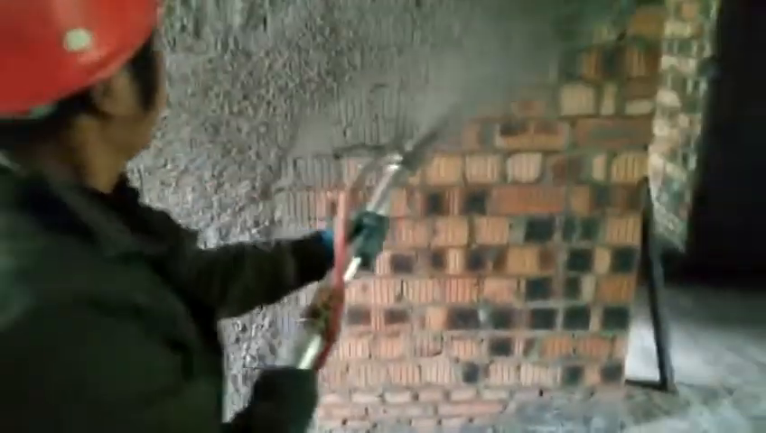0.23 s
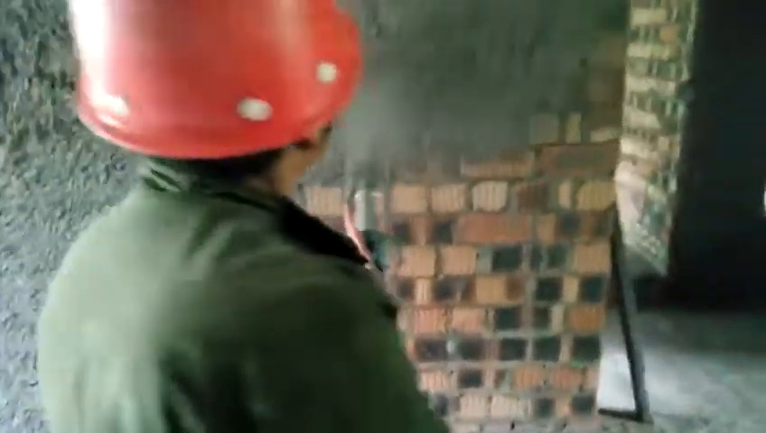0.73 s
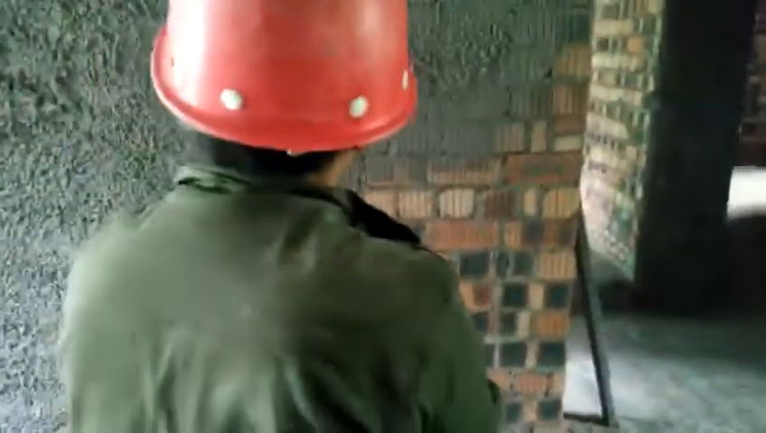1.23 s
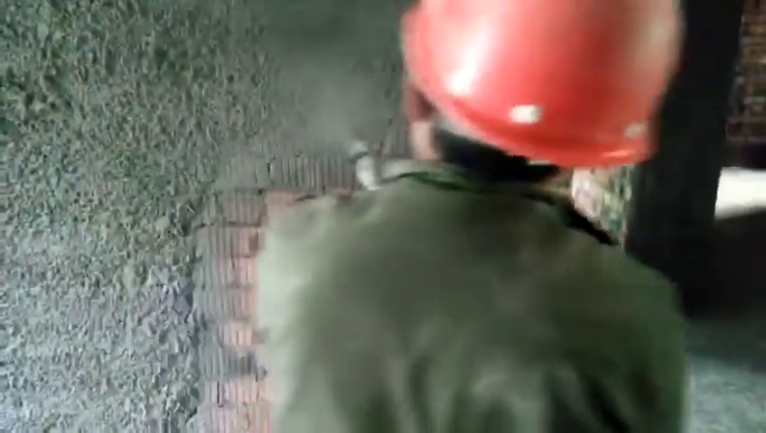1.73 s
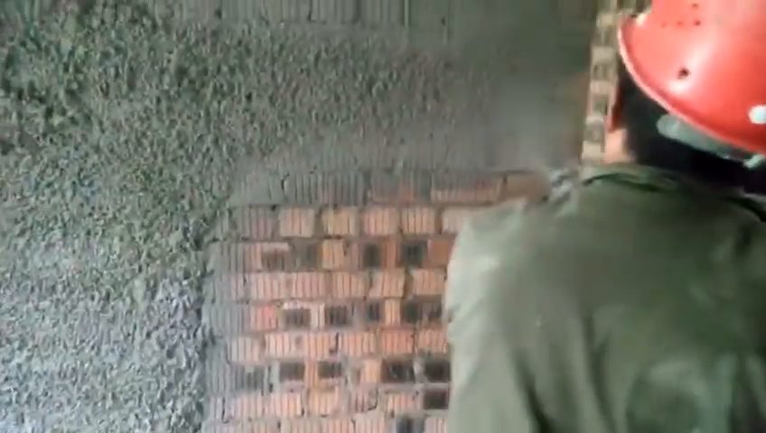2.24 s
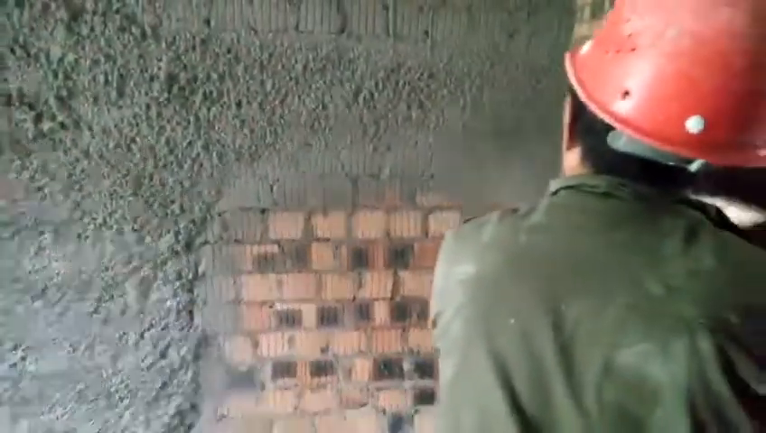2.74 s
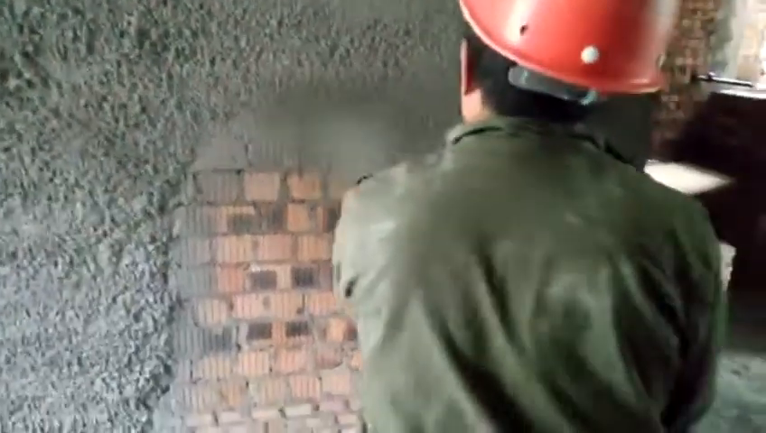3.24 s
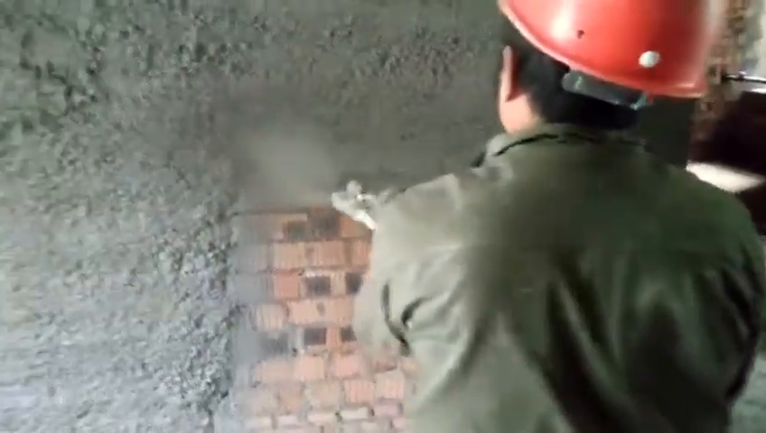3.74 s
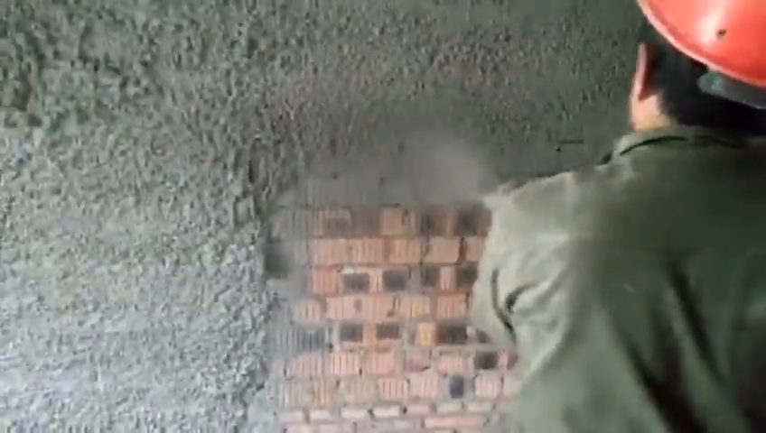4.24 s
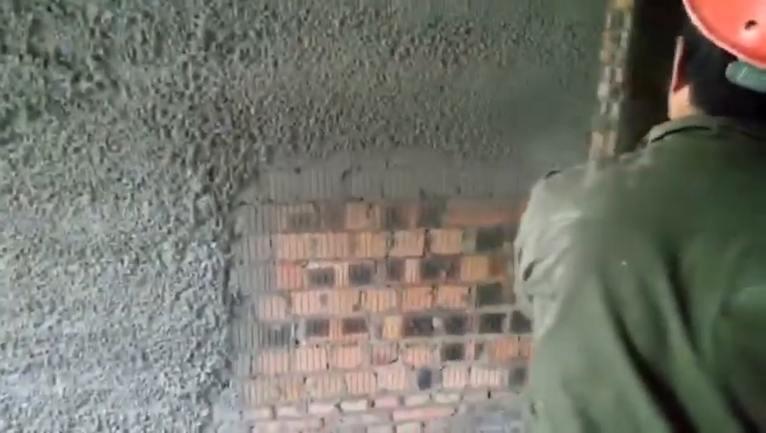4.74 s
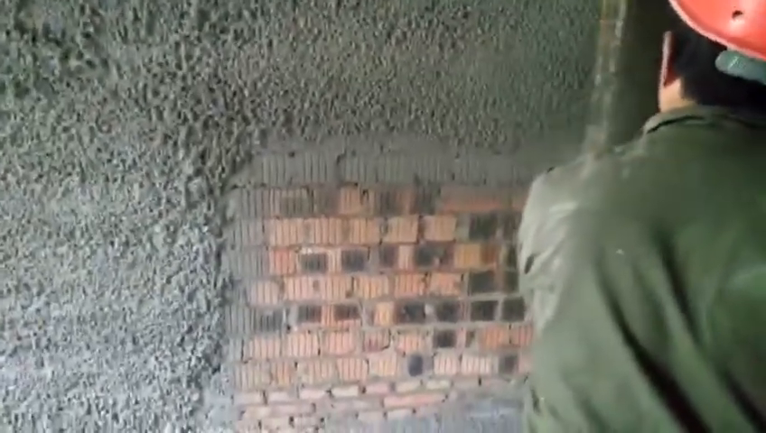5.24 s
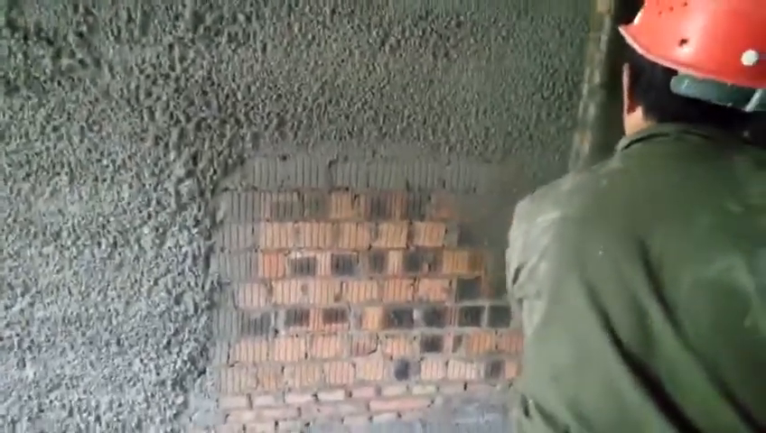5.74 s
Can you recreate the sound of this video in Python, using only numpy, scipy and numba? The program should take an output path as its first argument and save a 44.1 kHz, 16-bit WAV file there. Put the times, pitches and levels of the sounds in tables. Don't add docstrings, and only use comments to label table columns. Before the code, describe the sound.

A spray gun roars and hisses without pause as wet mortar hits brick, with faint hollow knocks in its pipe, in a bare echoing room.

```python
import sys
import numpy as np
from scipy import signal
from scipy.fft import rfft, irfft, next_fast_len
from scipy.io import wavfile
from scipy.ndimage import uniform_filter1d, map_coordinates
from numba import njit

SR = 44100
rng = np.random.default_rng(int(sys.argv[2]) if len(sys.argv) > 2 else 0)


def amplitude_ratio(level_db):
    exponent = np.asarray(level_db, float) / 20
    return 10 ** exponent


def inscribe(sig):
    pcm = np.round(np.clip(np.atleast_2d(sig).T, -1, 1) * 32767)
    wavfile.write(sys.argv[1], SR, pcm.astype(np.int16))


N = 264159

# [start_s, roar_level_db, mortar_load_db (over its mean),
# splatter_facing_db (toward the microphone)]
SPRAY_COURSE = [(0, -27.5, 0, -3), (.3, -28.5, -2.5, -1.5), (.65, -26, 0.5, -1), (.85, -28, -1.5, -0.5),
                (1.05, -29, -1.5, -2.5), (1.33, -28, -0.5, 1.5), (1.6, -27.5, 1, -2), (2.2, -28, -.5, 1),
                (2.6, -27.5, 3, 0), (2.88, -25.5, 3, 0.5), (3.2, -28.5, -1, 1.6), (3.9, -28, -1, -2.5),
                (4.4, -27.5, 0.5, -2.5), (4.65, -29, -1, 1.5), (5.05, -26.5, 2.5, 1.5),
                (5.38, -28, -0.4, 3), (5.75, -26.5, 3.5, -0.7), (5.99, -27, 3, 0.5)]


def jet():
    roar_db, load_db, facing_db = columns(SPRAY_COURSE)
    surge_db = roar_db + 27.5
    upper_db = -13 - (1 - 0.03) * surge_db
    grit_db = -17 - (1 - 0.091) * surge_db - load_db - clot_choke_db()
    splat_db = -9.5 - (1 - 0.13) * surge_db + facing_db
    spray = nozzle_roar() + amplitude_ratio(upper_db) * upper_jet()
    spray = spray + amplitude_ratio(grit_db) * grit_hiss() + amplitude_ratio(splat_db) * splatter()
    return amplitude_ratio(roar_db) * hold_roar(walls(spray, count=9))


# [pitch_hz, level_db (per Hz)]
ROAR_COLOUR = [(820, -36), (1400, -8.5), (1780, -3.5), (1930, -2.5), (2300, 1), (3000, -14.5),
               (3900, -32.5), (6600, -120)]


def nozzle_roar():
    return turbulence(ROAR_COLOUR, patchy_db=0.62, patch_rate=4.01, flicker_db=0.0, flicker_rate=12, count=6)


# [pitch_hz, level_db (per Hz)]
UPPER_COLOUR = [(1760, -25), (3000, -4), (4320, -9.5), (4810, -12), (6260, -5), (7100, -10), (9230, -74.5),
                (15600, -120)]


def upper_jet():
    return turbulence(UPPER_COLOUR, patchy_db=1.08, patch_rate=8.2, flicker_db=0.6, flicker_rate=16, count=8)


# [pitch_hz, level_db (per Hz)]
GRIT_COLOUR = [(4200, -22.5), (7100, -5), (7500, -3.5), (9500, 0.5), (11000, -2.5), (11800, -8),
               (12300, -12), (12800, -17), (13400, -17.5), (14000, -13.8), (14300, -15.5)]


def grit_hiss():
    colour = GRIT_COLOUR
    return turbulence(colour, patchy_db=0.95, patch_rate=10, flicker_db=0.7, flicker_rate=14, count=7)


# [centre_s, depth_db, length_s]
CLOTS_IN_NOZZLE = [
    (0.657, 4, .1),
    (1.15, 2.5, 0.073),
    (1.345, 5, 0.068),
    (1.522, 1.5, .08),
    (1.803, -1.5, .08),
    (2.87, 4, 0.081),
    (4.065, 4.5, 0.091),
    (5.2, 3, .08),
    (5.727, 1.5, .12),
]


def clot_choke_db():
    now = np.arange(N) / SR
    return sum(depth * np.exp(-(2 * (now - s) / length) ** 2) for s, depth, length in CLOTS_IN_NOZZLE)


# [pitch_hz, level_db (per Hz)]
SPLAT_COLOUR = [(700, -48), (880, -23), (960, -11.5), (1080, 1.5), (1400, -1), (1820, -32), (3080, -120)]


def splatter():
    return turbulence(SPLAT_COLOUR, patchy_db=0.86, patch_rate=5, flicker_db=1.0, flicker_rate=22, count=4)


def hold_roar(spray):
    power = uniform_filter1d(uniform_filter1d(spray ** 2, SR // 16), SR // 16)
    hiss = signal.sosfiltfilt(signal.butter(2, 3000, "high", fs=SR, output="sos"), spray)
    steady = 0.34
    held_roar = (spray - hiss) * power.mean() ** (steady - 0.31) / power ** steady
    return held_roar + hiss / power.mean() ** 0.23


def walls(x, count):
    out, now = x.copy(), np.arange(N)
    lags_s, signs = rng.uniform(.003, .035, count), rng.choice([-1, 1], count)
    for lag_s, sign in zip(lags_s, signs):
        swing_s = .00022 * walk(4.5) + .00025 * walk(.9)
        echo = map_coordinates(x, [now - SR * (lag_s + swing_s)], order=3, mode="wrap")
        out += sign * amplitude_ratio(-5.5) * np.exp(-lag_s / .03) * echo
    return out * np.std(x) / np.std(out)


# [pitch_hz, width_hz, level_db]
LOW_PAIR = [(363.8, 40, -4.5), (403, 64, 0)]
# [centre_s, level_db, length_s]
LOW_SLUGS = [(0.125, -50.5, 0.091), (0.544, -51.5, 0.38), (0.99, -50, 0.71), (1.426, -48, 0.25),
             (1.794, -42.5, 0.21), (2.124, -43.5, 0.53), (2.61, -40.5, 0.29), (3.07, -47, 0.27),
             (3.332, -44, 0.28), (3.83, -50, 0.11), (4.31, -51.5, 0.21), (4.68, -46, 0.16),
             (5.402, -55, 0.26), (5.916, -53.5, 0.13)]
# [centre_s, level_db, length_s, pitch_hz]
MIDDLE_SLUGS = [(.15, -39, 0.44, 602), (.52, -42.5, 0.26, 600), (.85, -54, 0.14, 625),
                (1.22, -45.5, 0.39, 585), (1.65, -43.5, .25, 567), (1.98, -39, 0.29, 579),
                (2.3, -45.5, 0.28, 598), (2.78, -44.5, 0.1, 627), (3.17, -39.5, 0.44, 614),
                (3.45, -46, 0.13, 620), (3.75, -42, 0.51, 606), (4.219, -36.5, 0.2, 586),
                (4.9, -39.5, 0.26, 626), (5.12, -41, 0.24, 645), (5.329, -41, 0.15, 621),
                (5.75, -46.5, 0.43, 603)]
# [centre_s, level_db, length_s]
HIGH_SLUGS = [(.02, -64.5, 0.055), (.65, -60, 0.21), (1.15, -51.5, 0.27), (1.5, -40.5, 0.19),
              (1.73, -41.5, 0.36), (2.35, -48, 0.34), (2.58, -43.5, 0.26), (2.999, -47.5, 0.35),
              (3.24, -51, 0.14), (3.6, -50.5, .1), (4.2, -51, 0.65), (4.7, -47.5, 0.27), (5.5, -57.5, 0.99)]
BETWEEN_SLUGS = (-55, -47.5, -66.5)
# [start_s, peak_db, pitch_hz]
LUMPS = [(0.041, -39.5, 641), (0.139, -30, 626), (0.185, -33, 646), (0.335, -33.5, 580),
         (0.388, -35.5, 579), (0.414, -34.5, 565), (0.491, -29, 600), (0.57, -27, 583), (0.6, -34.5, 590),
         (0.707, -39, 540), (0.827, -35, 650), (0.899, -38, 390), (1.145, -33, 525), (1.187, -32.5, 573),
         (1.27, -35, 575), (1.477, -29, 828), (1.579, -36, 584), (1.662, -34.5, 579), (1.716, -32, 543),
         (1.968, -28.5, 406), (2, -29, 543), (2.033, -31, 536), (2.127, -37, 415), (2.183, -31, 530),
         (2.254, -33, 468), (2.357, -33, 654), (2.438, -33.5, 409), (2.515, -31, 635), (2.631, -32.5, 400),
         (2.757, -33.5, 636), (2.79, -36, 575), (2.892, -33, 567), (2.932, -36.5, 651), (3.119, -30, 430),
         (3.178, -30.5, 597), (3.21, -32, 540), (3.297, -30, 412), (3.349, -34, 393), (3.585, -34.5, 555),
         (3.706, -32, 598), (3.886, -30.5, 522), (4.08, -38, 584), (4.147, -33, 570), (4.178, -33.5, 587),
         (4.426, -38, 664), (4.647, -30, 420), (4.688, -32, 417), (4.786, -30, 632), (4.86, -33, 712),
         (4.9, -35, 658), (4.986, -34, 535), (5.126, -31.5, 670), (5.192, -32.5, 705), (5.287, -31, 663),
         (5.346, -30, 576), (5.606, -40.5, 641), (5.65, -31, 579), (5.796, -33, 620), (5.853, -41, 610),
         (5.892, -38, 633)]


def lance():
    all_slugs = (LOW_SLUGS, MIDDLE_SLUGS, HIGH_SLUGS)
    low_db, middle_db, high_db = [swells(*np.transpose(slugs)[:3], rest_db)
                                  for slugs, rest_db in zip(all_slugs, BETWEEN_SLUGS)]
    middle_hz = columns(MIDDLE_SLUGS)[-1]
    low_flow, middle_flow, high_flow = [rng.standard_normal(N) * amplitude_ratio(2.6 * walk(30)) for _ in range(3)]
    low = sum(amplitude_ratio(db) * ring(low_flow, hz * (1 + 0.022 * walk(2.8)), width) for hz, width, db in LOW_PAIR)
    middle = sum(ring(middle_flow, middle_hz * (side + 0.016 * walk(8)), 81) for side in (.955, 1.045))
    high = ring(high_flow, 838 * (1 + 0.018 * walk(2.7)), 120)
    low = level(even(low, .25, 0.078), low_db - 1.5)
    middle = level(even(middle, .25, .07), middle_db - 4.0)
    high = level(even(high, .35, 0.066), high_db - 3.0)
    return low + middle + high + knocks(LUMPS, rise_s=.006, gain_db=-2.5)


# [centre_s, throb_db, rumble_db, length_s]
PUMP_STROKES = [(0.037, -55.5, -72, 0.18), (0.493, -65, -73.5, 0.4), (1.153, -66, -61, 0.16),
                (1.4, -63, -68, 0.23), (1.56, -53, -69, 0.097), (1.806, -53, -62, 0.14),
                (1.967, -56, -74, 0.18), (2.15, -54, -70.5, 0.17), (2.467, -53, -68, .12),
                (2.65, -51, -64, 0.19), (2.897, -66, -58, 0.17), (3.064, -56, -58, 0.13),
                (3.387, -66, -65, .15), (3.54, -56, -63, 0.15), (3.832, -62, -65, .1), (3.98, -70, -68, .1),
                (4.5, -65, -64, 0.3), (4.8, -67, -65, 0.19), (5.03, -61, -62, 0.092), (5.23, -62, -66, .12),
                (5.42, -63, -59, .2), (5.647, -75, -66, 0.17), (5.916, -64, -65, 0.22)]
# [pitch_hz, width_hz, level_db]
PUMP_HUMS = [
    (63.5, 9.7, -4.5),
    (120.3, 14, -0.5),
    (138, 15, 4.5),
]
# [pitch_hz, level_db (per Hz)]
RUMBLE_COLOUR = [(12, -19.5), (40, -7.5), (124, -5.5), (209, -15.5), (247, -13), (310, -8), (390, -56),
                 (660, -120)]
# [start_s, peak_db, pitch_hz]
VALVE_THUMPS = [(0.22, -59, 135), (0.517, -56, 118), (0.809, -61, 75.4), (1.101, -72, 178),
                (1.101, -57, 53.8), (1.541, -54, 132), (1.745, -47, 127), (2.11, -51, 129),
                (2.443, -60, 40.4), (2.443, -47, 125), (2.632, -68, 178), (2.633, -41, 137),
                (2.873, -52, 110), (3.031, -53, 148), (3.287, -57, 62.4), (3.412, -49, 64.6),
                (3.814, -54, 151), (3.948, -59, 67.3), (4.035, -57, 135), (4.365, -63, 140),
                (4.461, -56, 56.5), (5.003, -56, 118), (5.197, -53, 129), (5.377, -53, 111),
                (5.574, -58, 124), (5.907, -54, 137)]


def pump():
    s, throbs, rumbles, lengths = np.transpose(PUMP_STROKES)
    throb_db = swells(s, throbs, lengths, rest_db=-75)
    rumble_db = swells(s, rumbles, lengths, rest_db=-77)
    hum = sum(level(ring(rng.standard_normal(N), hz, width), db) for hz, width, db in PUMP_HUMS)
    hum = level(even(hum, 0.25, 0.09), throb_db - 4.0)
    rumble = turbulence(RUMBLE_COLOUR, patchy_db=1.0, patch_rate=3, flicker_db=0.5, flicker_rate=18, count=6)
    drone = turbulence(RUMBLE_COLOUR, patchy_db=3.0, patch_rate=3.3, flicker_db=-1.0, flicker_rate=49, count=6)
    thumps = knocks(VALVE_THUMPS, rise_s=.016, gain_db=-4)
    return thumps + hum + amplitude_ratio(rumble_db - 2.5) * rumble + amplitude_ratio(-70.5) * drone


def turbulence(shape, patchy_db, patch_rate, flicker_db, flicker_rate, count):
    size = next_fast_len(N)
    log_hz = np.log(np.fft.rfftfreq(size, 1 / SR) + 1)
    hz, db = np.transpose(shape)
    knots = np.log(hz)
    noise = rfft(rng.standard_normal(size)) * amplitude_ratio(np.interp(log_hz, knots, db, -120, -120))
    centres, step = np.linspace(knots[0], knots[-1], count, retstep=True)
    out = np.zeros(N)
    for c in centres:
        band = np.cos(np.pi / 2 * np.clip((log_hz - c) / step, -1, 1)) ** 2
        out += amplitude_ratio(patchy_db * walk(patch_rate)) * irfft(noise * band, size)[:N]
    return level(out * amplitude_ratio(flicker_db * walk(flicker_rate)), 0)


def knocks(table, rise_s, gain_db):
    t, out = np.arange(int(8 * rise_s * SR)) / SR, np.zeros(N + SR)
    shape = (t / rise_s * np.exp(1 - t / rise_s)) ** 2
    for s, db, hz in table:
        i = int(s * SR)
        out[i:i + len(t)] += amplitude_ratio(db + gain_db) * shape * np.sin(2 * np.pi * hz * t)
    return out[:N]


def swells(times, dbs, lengths, rest_db):
    t = np.arange(0, N + 64, 64) / SR
    bells = amplitude_ratio(dbs[:, None]) * np.exp(-(2 * (t - times[:, None]) / lengths[:, None]) ** 2)
    db = 10 * np.log10(amplitude_ratio(rest_db) ** 2 + (bells ** 2).sum(axis=0))
    return np.interp(np.arange(N) / SR, t, db)


@njit
def svf(x, hz, width):
    y, b, l = np.empty(len(x)), 0., 0.
    for i in range(len(x)):
        g, k = np.tan(np.pi * hz[i] / SR), width / hz[i]
        v = (b + g * (x[i] - l)) / (1 + g * (g + k))
        b, l, y[i] = 2 * v - b, l + 2 * g * v, k * v
    return y


def ring(x, hz, width):
    hz = hz * np.ones(N)
    return svf(svf(x, hz, 1. * width), hz, 1. * width)


def walk(rate):
    k = int(SR / rate)
    held = np.repeat(rng.standard_normal(N // k + 1), k)
    return 1.22 * uniform_filter1d(uniform_filter1d(held, k), k)[:N]


def even(x, hold, window_s):
    k = int(window_s * SR)
    power = uniform_filter1d(uniform_filter1d(x ** 2, k), k).clip(0)
    return x / (power + 1e-18) ** hold


def level(x, db):
    return x * amplitude_ratio(db) / np.sqrt(np.mean(x ** 2))


def columns(table):
    s, *rest = np.transpose(table)
    return [np.interp(np.arange(N) / SR, s, c) for c in rest]


def scene():
    return (jet() + lance() + pump())[None]


# [pitch_hz, step_db (over the level nearby)]
ROUNDING = [(200, -24), (1000, -14), (2400, -8), (3200, 0), (4700, 5), (6200, .5), (7500, 4.2), (10000, 1)]


def phone_thinning(x):
    size = 1024
    n, k = np.arange(2 * size), np.arange(size)
    window = np.sin(np.pi * (n + .5) / (2 * size))
    basis = window * np.cos(np.pi / size * np.outer(k + .5, n + .5 + size / 2)) * np.sqrt(2 / size)
    frames = N // size + 2
    halves = np.pad(x, (size, (frames + 1) * size - N - size)).reshape(-1, size)
    lines = np.hstack([halves[:-1], halves[1:]]) @ basis.T
    power = uniform_filter1d(uniform_filter1d(lines ** 2, 64, axis=1), size=3, axis=0)
    nearby = np.sqrt(power.clip(0))
    hz, db = np.transpose(ROUNDING)
    margin = amplitude_ratio(np.interp(np.log((k + .5) * SR / 2 / size), np.log(hz), db))
    treble = np.clip(k * SR / 2 / size / 11000, 0, 1) ** 2
    hiss = nearby[:, 400:500]
    floor = amplitude_ratio(1.8) * treble * hiss.mean(axis=1, keepdims=True) ** .7 * hiss.mean() ** .3
    patches = np.repeat(rng.standard_normal((frames, size // 8)), 8, axis=1)
    starve = uniform_filter1d(patches, size=5, axis=0)
    starve_db = 2 * 2.8 * starve + 14 * (starve > .8) * (k > 120)
    step = np.maximum(nearby * margin * amplitude_ratio(starve_db), floor * amplitude_ratio(1.2 * starve[:, -1:]))
    steps = np.floor((np.abs(lines) / step) ** .75 + .4054)
    back = (np.sign(lines) * steps ** (4 / 3) * step) @ basis
    out = np.zeros_like(halves)
    out[:-1] += back[:, :size]
    out[1:] += back[:, size:]
    return out.ravel()[size:size + N]


def top_cut(x):
    return signal.sosfilt(signal.butter(12, 14150, fs=SR, output="sos"), x)


def record(dry):
    mix = phone_thinning(dry[0])[None]
    return top_cut(mix)


dry = scene()
out = record(dry)
inscribe(out)
```